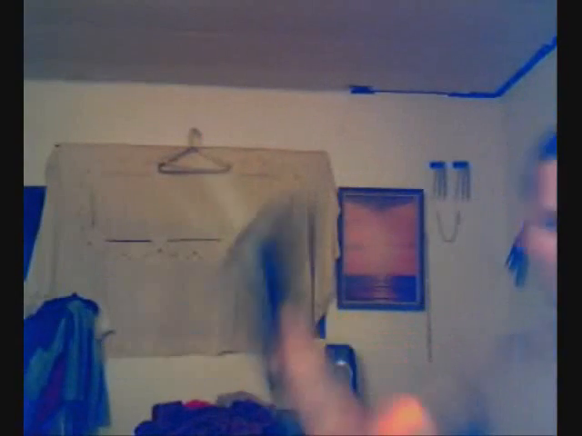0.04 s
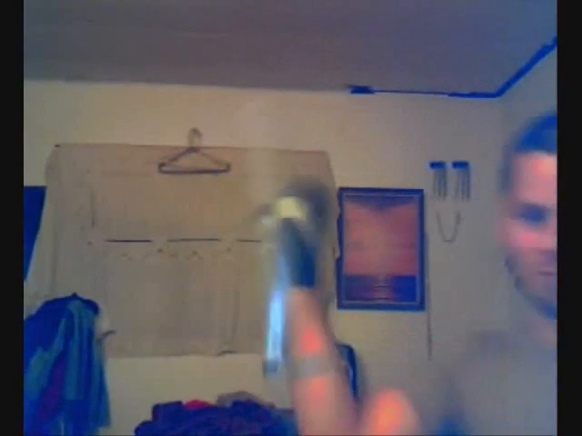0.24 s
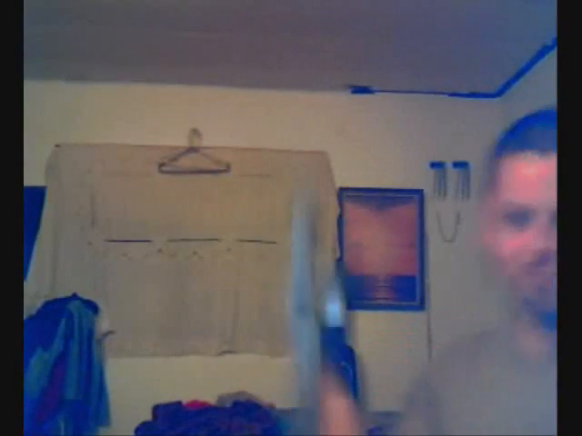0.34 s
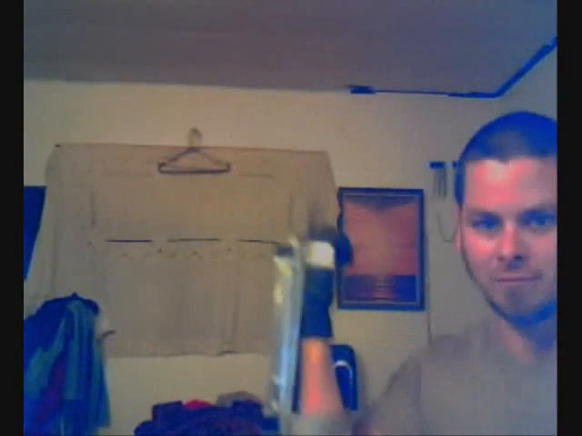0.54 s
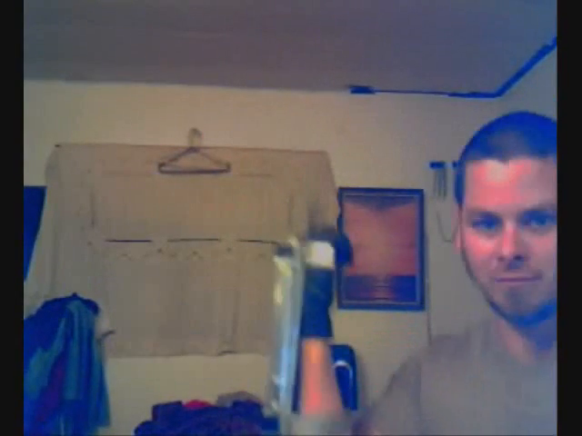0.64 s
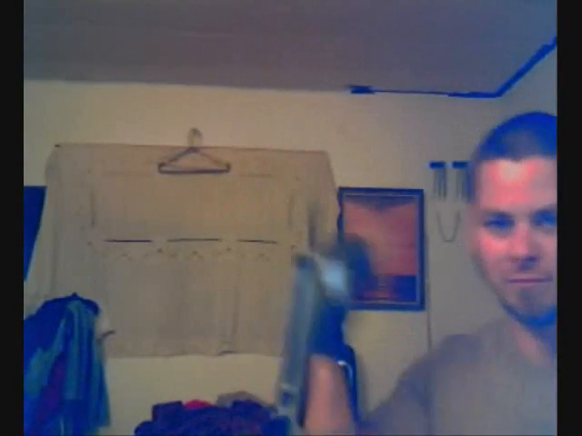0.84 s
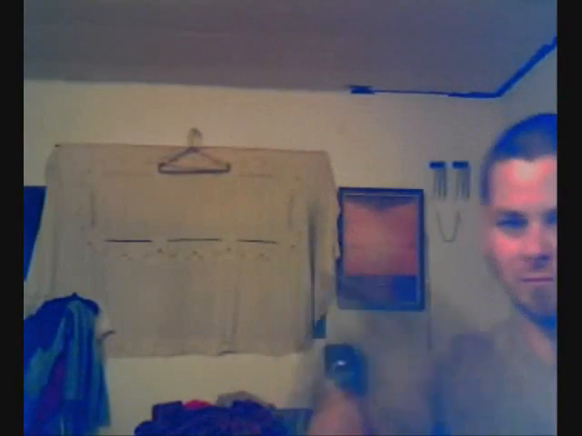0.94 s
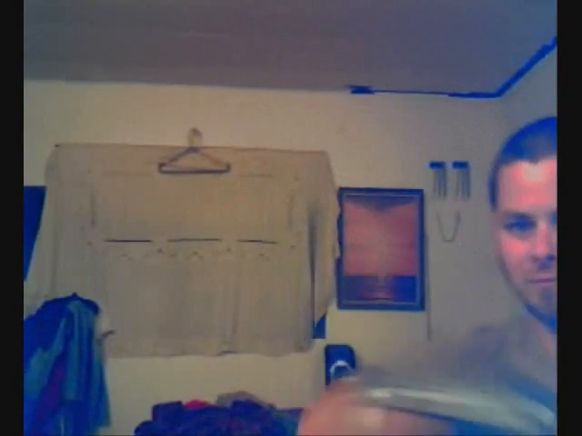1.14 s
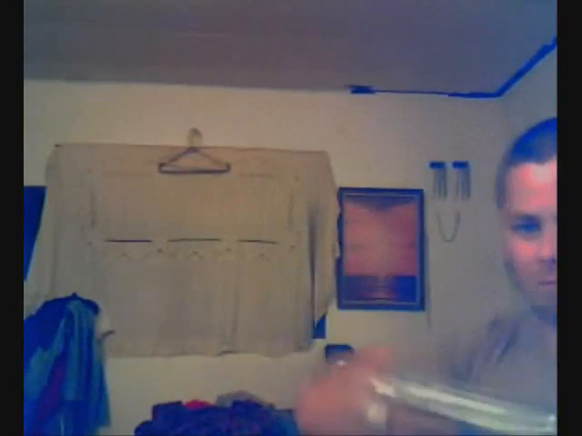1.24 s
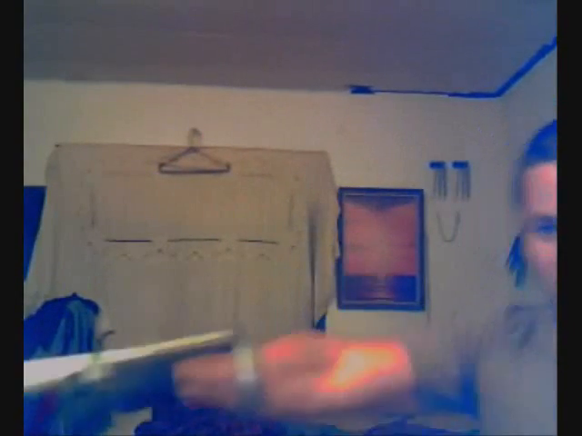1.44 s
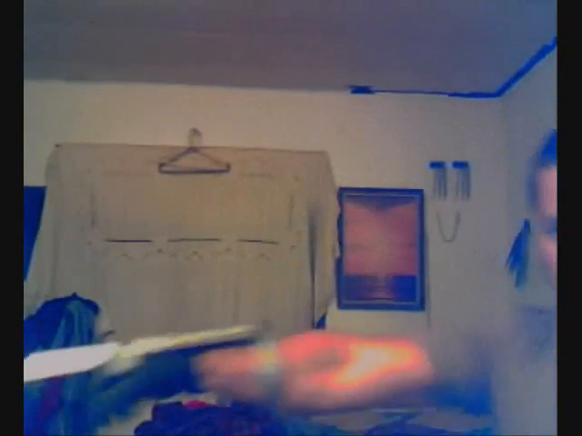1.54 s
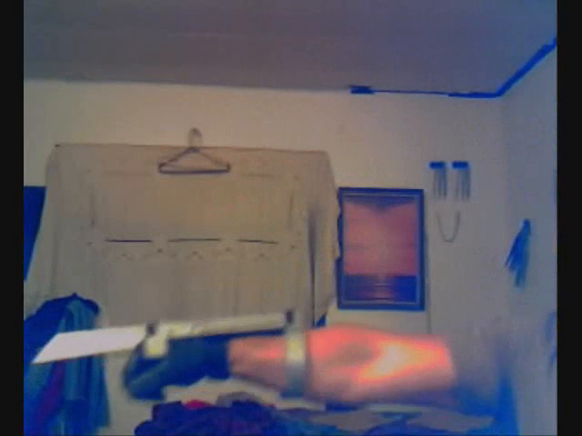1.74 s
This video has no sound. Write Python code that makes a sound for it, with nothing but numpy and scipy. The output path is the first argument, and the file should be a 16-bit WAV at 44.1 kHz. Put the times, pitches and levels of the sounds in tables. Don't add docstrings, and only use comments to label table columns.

```python
import sys
import numpy as np
from scipy import signal
from scipy.fft import rfft, irfft
from scipy.io import wavfile
from scipy.ndimage import uniform_filter1d, map_coordinates

SR = 44100
rng = np.random.default_rng(int(sys.argv[2]) if len(sys.argv) > 2 else 0)


def store_wav(level_fs):
    pcm = np.round(np.clip(np.atleast_2d(level_fs), -1, 1) * 32767)
    wavfile.write(sys.argv[1], SR, pcm.T.astype(np.int16))


def volts_from_decibels(level):
    exponent = np.asarray(level, float) / 20
    return 10 ** exponent


N = 79380

# f/Hz, level/dB
FLOOR = [(20, -5), (45, 4.5), (110, 0.5), (210, -9.5), (1200, -15), (5000, -24), (8100, -18.5),
         (11000, -23.5)]
# f/Hz, likeness/1
LIKENESS = [(60, 1), (130, 0.55), (300, 0.32), (1400, 0.37), (3000, 0.05), (9000, 0.0501)]
# t/s, level/dB
SWISH = [(0, 3), (.18, 1.5), (.45, -0.5), (1.8, -1)]
# f/Hz, rms level/dB
HUM = [(118, -58.5), (177, -63.5), (994, -70), (7634, -71.5)]
# f/Hz, rms level/dB
WHINE = [(1222, -60), (2444, -60.5), (3666, -64), (3973, -68), (4587, -69.5), (4893, -69), (5195, -68.5),
         (6417, -67), (7634, -65.5), (10083, -60.5), (12398, -81.5)]
# t/s, level/dB, length/s
PUFFS = [
    (0.062, -43.5, .03),
    (.14, -51, .03),
    (1.206, -40, 0.022),
    (1.8, -36, 0.0047),
]
# t/s, level/dB, dull body/dB
EARLY_RUB = [(0, -54, -10.5), (0.029, -59, -10), (.06, -60.5, -6.5), (.12, -52, 3), (.19, -58, -4.5)]
# t/s, level/dB, dull body/dB
STROKES = [
    [(.196, -46, -7), (.205, -36, -2), (.213, -21, -21), (.223, -11.5, -30), (.26, 1, -29),
     (.295, 4.5, -13), (.308, 8.5, -4), (.316, -17, -6), (.36, -36, -14)],
    [(1.19, -49.5, 11), (1.216, -45.5, 5.5), (1.226, -23, -3.5), (1.265, -3.5, -23), (1.3, 0.5, -4.5),
     (1.328, -11, -16.5), (1.34, -34, -11.5), (1.41, -26.5, -16), (1.48, -54.5, 6.5)],
]
# t/s, level/dB, dull body/dB
TURNING_RUB = [(0.825, -57, -25), (0.835, -45, -9.5), (0.879, -51, -15), (0.957, -50.5, -5.5),
               (0.983, -69.5, -12), (0.99, -67, -16)]
# t/s, peak level/dB, dull body/dB, rattle length/ms
TICKS = [(0.0696, -31, -22.5, 3.5), (0.083, -20, -27, 2.6), (0.096, -17, -38.5, 3.6), (.1, -15, -23, 4.2),
         (.163, -24, -21, 1.6), (0.1751, -6, -32.5, 1.1), (0.1828, -14, -24, 1.2), (0.2232, -7, -24, 3.1),
         (.389, -12, -23.5, 1.1), (.831, -42, -16, 2.5), (1.112, -29.5, -11.5, 2.2),
         (1.1215, -18, -15, 1.1), (1.1323, -5, -10, 1.9), (1.1386, -13, -7, 3.3), (1.2014, -26.5, -9, 2.5),
         (1.2243, -14.5, -14, 2.6), (1.36, -10.5, -22, 2.9), (1.4, -16.5, -18.5, 2.8),
         (1.4396, -29, -17, 2.1), (1.472, -23.5, -20, 1.6), (1.662, -40, -20.5, 2.5)]
# f/Hz, level per Hz/dB
SCRAPE = [(3500, -32), (5200, -12.5), (6000, -12), (6700, -1), (7600, -0.5), (8700, -1), (10300, -16.5),
          (15800, -13.5)]
SIDEWAYS = [(3000, -31.5), (6000, -11), (7300, -2.5), (8800, -1.5), (10200, -12), (11800, -11),
            (13000, -15.5), (15800, -13)]
BRIGHT = [(2500, -34.5), (4200, -32), (5200, -15.5), (6100, -15.5), (7200, -5.5), (8400, 0), (10500, -15),
          (15800, -20.5)]
BODY = [(900, -41), (1500, -10.5), (2100, -8), (3500, -6.5), (5200, -1), (7000, -7.5), (12000, -8)]
# f/Hz, level/dB, t60/s
BLADE_MODES = [(2150, -17, .011), (3130, -17, .012), (4520, -18, .011), (6080, -18, .009)]
# t/s, lag of the right microphone/us, share of room/dB
ARM = [(0, -20.5, 2.5), (.1, -10.5, 0.5), (.17, -11.5, -1), (.3, 4, 0.5), (.9, 5.5, 6.5),
       (1.12, 34.5, -7.5), (1.135, 37.5, 3), (1.2, 18.5, 6.5), (1.24, -54, 11.5), (1.27, -57.5, 6),
       (1.8, -34.5, -9.5)]
# f/Hz, level per Hz/dB
SPLATTER = [(30, -1), (200, 12.5), (1000, 1.5), (4000, -5), (15000, 6)]
BIAS_SHIFT = [
    [-0.34],
    [-0.57],
]

FLOOR_DB = -47
WHINE_START_S, WHINE_EVERY_S, WHINE_LENGTH_S = .0098, .1335, .033
WHINE_HISS_DB, BUZZ_HZ, BUZZ_DB = -63, 305.5, -72.5
PUFF_TOP_HZ = 90
GRAINS_PER_S, GRAIN_SPREAD_DB, FLUTTER_DB, JUDDER_DB = 9000, 2, 1, 1.4
STROKE_GAIN_DB, TICK_GAIN_DB, FIRST_TOUCH_DB = 1, -0.5, 4
SIDE_ON_FROM_S = .5
ROOM_DB, ROOM_LOW_T60_S, ROOM_T60_S, ROOM_TOP_T60_S = -7.5, 0.13, 0.16, 0.13
LATE_DB, LATE_T60_S = -20.5, 0.32
TOP, OFFSET = 0.84, -.021
CRACKLE_FROM, CRACKLE_POWER, BUILD_UP_S, SPLATTER_DB = .02, 0.43, .008, -11
BIAS_LOW_HZ, BIAS_HIGH_HZ, COUPLING_HZ = 7.4, 29.5, 1.5


def in_time(rows, **edge):
    s, *columns = np.transpose(rows)
    return [np.interp(np.arange(N) / SR, s, c, **edge) for c in columns]


def at_hz(points, hz):
    f, values = np.transpose(points)
    return np.interp(np.log(hz + 1), np.log(f), values)


def butter(x, order, hz, kind):
    return signal.sosfilt(signal.butter(order, hz, kind, fs=SR, output="sos"), x)


def colour(x, spectrum):
    size = 4096
    gain = volts_from_decibels(at_hz(spectrum, np.fft.rfftfreq(size, 1 / SR)))
    cepstrum = irfft(np.log(gain / np.sqrt(np.mean(gain ** 2))))
    cepstrum[1:size // 2] *= 2
    cepstrum[size // 2 + 1:] = 0
    response = irfft(np.exp(rfft(cepstrum)))[:size // 2]
    return signal.fftconvolve(x, response)[:N]


def drift(rate):
    r = np.exp(-2 * np.pi * rate / SR)
    slow = signal.lfilter([1], [1, -2 * r, r * r], rng.standard_normal(N + SR))[SR:]
    return slow / slow.std()


def floor():
    t, hz = np.arange(N) / SR, np.fft.rfftfreq(N, 1 / SR)
    alike = np.clip(at_hz(LIKENESS, hz), -1, 1)
    mid, side = rfft(rng.standard_normal((2, N))) * volts_from_decibels(at_hz(FLOOR, hz)) * (hz > 20)
    noise = irfft(np.sqrt(1 + alike) * mid + np.sqrt(1 - alike) * side * [[1], [-1]], N)
    hum = 0
    for f, db in HUM:
        level = volts_from_decibels(db + 2.2 * drift(8)) * np.sqrt(2)
        hum += level * np.sin(2 * np.pi * f * t + 0.5 * drift(15))
    return volts_from_decibels(FLOOR_DB + in_time(SWISH)[0]) * noise / noise.std() + hum


def whine():
    t = np.arange(N) / SR
    gate = (t - WHINE_START_S) % WHINE_EVERY_S < WHINE_LENGTH_S
    on = uniform_filter1d(1. * gate, size=60)
    buzz = [(k * BUZZ_HZ, BUZZ_DB) for k in range(3, 22) if k % 4]
    tones = 0
    for hz, db in WHINE + buzz:
        tones += volts_from_decibels(db) * np.sqrt(2) * np.sin(2 * np.pi * (hz * t + rng.random()))
    return on * (tones + volts_from_decibels(WHINE_HISS_DB) * colour(rng.standard_normal(N), BODY))


def puffs():
    t = np.arange(N) / SR
    shape = sum(volts_from_decibels(db) * np.exp(-((t - s) / length) ** 2) for s, db, length in PUFFS)
    air = butter(rng.standard_normal(N), 2, [20, PUFF_TOP_HZ], "band")
    return shape * air / air.std()


def grains():
    sizes = volts_from_decibels(GRAIN_SPREAD_DB * np.minimum(rng.exponential(1, N), 4)) * rng.choice([-1, 1], N)
    struck = rng.random(N) < GRAINS_PER_S / SR
    x = sizes * struck * volts_from_decibels(FLUTTER_DB * drift(120) + JUDDER_DB * drift(34))
    return x / x.std()


def rubbing():
    hiss, dull = np.zeros((2, N))
    for rows in STROKES + [TURNING_RUB, EARLY_RUB]:
        level = volts_from_decibels(in_time(rows, left=-200, right=-200)[0] + STROKE_GAIN_DB)
        hiss += level
        dull += level * volts_from_decibels(in_time(rows)[1])
    return hiss, dull


def ticking(hits):
    t = np.arange(N) / SR
    bright, low = np.zeros((2, N))
    for s, db, body_db, ms in TICKS:
        burst = volts_from_decibels(db + TICK_GAIN_DB) * np.exp(-np.abs(t - s) * 1e3 / ms) * (t >= s)
        bright += burst
        low += burst * volts_from_decibels(body_db)
        hits[int(np.ceil(s * SR))] = volts_from_decibels(FIRST_TOUCH_DB)
    return bright, low


def ringing(blows):
    ring = 0
    for hz, db, t60 in BLADE_MODES:
        r, w = volts_from_decibels(-60 / (t60 * SR)), 2 * np.pi * hz / SR
        poles = [1, -2 * r * np.cos(w), r * r]
        ring += volts_from_decibels(db) * np.sqrt(1 - r * r) * signal.lfilter([1, 0, -1], poles, blows + 1e-18)
    return butter(ring, 3, 1500, "high")


def blade():
    side_on = np.arange(N) / SR >= SIDE_ON_FROM_S
    hits = grains()
    hiss, dull = rubbing()
    bright, low = ticking(hits)
    scrape = colour(hits * hiss * ~side_on, SCRAPE) + colour(hits * hiss * side_on, SIDEWAYS)
    ticks = colour(hits * bright, BRIGHT)
    body = colour(hits * (low + dull), BODY)
    return scrape + ticks + body + ringing(hits * low)


def bedroom(x):
    t, tail = np.arange(SR // 2) / SR, 0
    bands = [((100, 5000), ROOM_LOW_T60_S, 0), ((5000, 10000), ROOM_T60_S, 0),
             ((10000, 18000), ROOM_TOP_T60_S, 0), ((7000, 9500), LATE_T60_S, LATE_DB)]
    for band, t60, db in bands:
        noise = butter(rng.standard_normal((2, len(t))), 2, band, "band")
        tail = tail + noise * volts_from_decibels(db - 60 * t / t60) * np.clip(t / .004, 0, 1)
    tail = tail / np.sqrt(np.sum(tail ** 2, axis=1, keepdims=True))
    return volts_from_decibels(ROOM_DB) * signal.fftconvolve(x[None], tail, axes=1)[:, :N]


def scene():
    left = blade()
    lag_us, wet_db = in_time(ARM)
    right = map_coordinates(left, [np.arange(N) - lag_us * 1e-6 * SR], order=5)
    return np.array([left, right]) + bedroom(left * volts_from_decibels(wet_db)) + floor() + whine() + puffs()


def overload(dry):
    excess = uniform_filter1d(np.maximum(np.abs(dry) - TOP, 0), size=150)
    keep = np.exp(-1 / (BUILD_UP_S * SR))
    over = signal.lfilter([1 - keep], [1, -keep], np.clip(excess - CRACKLE_FROM, 0, .6))
    return np.abs(over) ** CRACKLE_POWER


def crackle(drive):
    rows = drive * rng.standard_normal(drive.shape)
    return volts_from_decibels(SPLATTER_DB) * np.array([colour(row, SPLATTER) for row in rows])


def sway(drive):
    bias = butter(drive, 1, [BIAS_LOW_HZ, BIAS_HIGH_HZ], "band")
    return np.array(BIAS_SHIFT) * butter(bias, 1, COUPLING_HZ, "high")


def band_limit(x):
    return signal.sosfilt(signal.butter(12, 15900, fs=SR, output="sos"), x)


def record(dry):
    drive = overload(dry)
    bent = dry + crackle(drive) + sway(drive)
    return band_limit(np.clip(bent, -TOP, TOP) + OFFSET)


dry = scene()
out = record(dry)
store_wav(out)
```